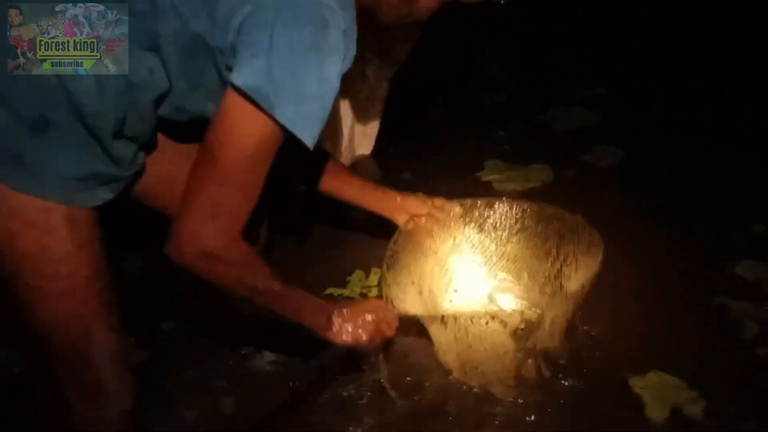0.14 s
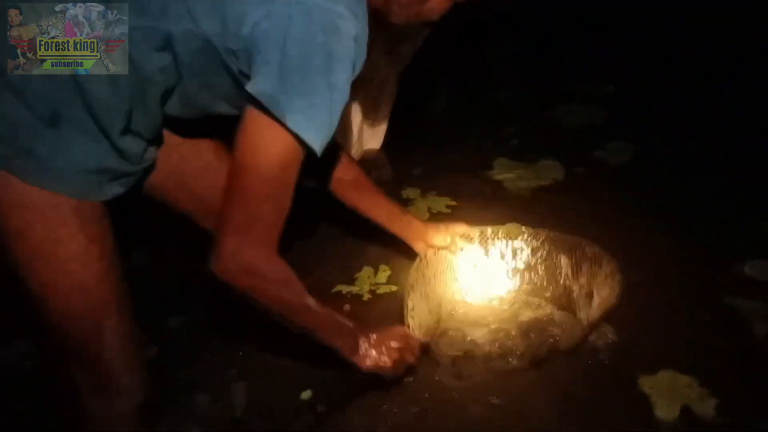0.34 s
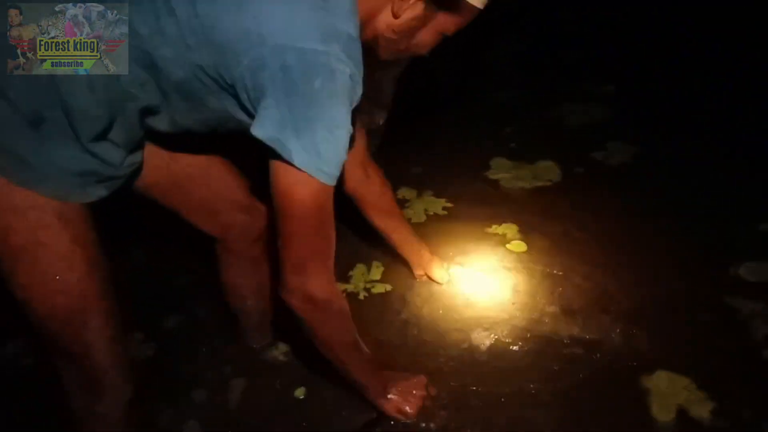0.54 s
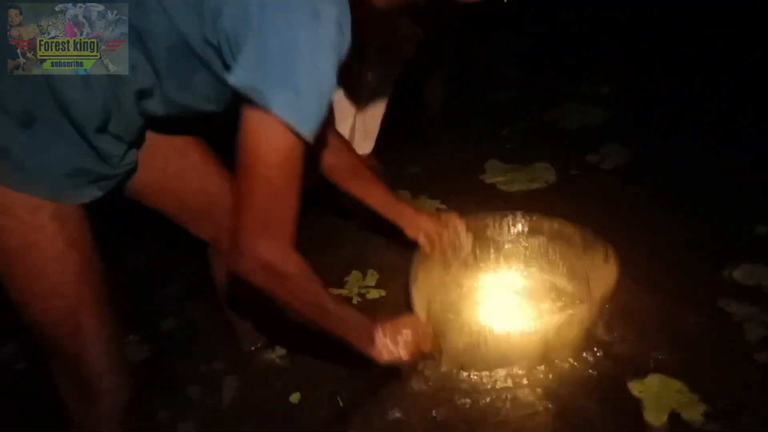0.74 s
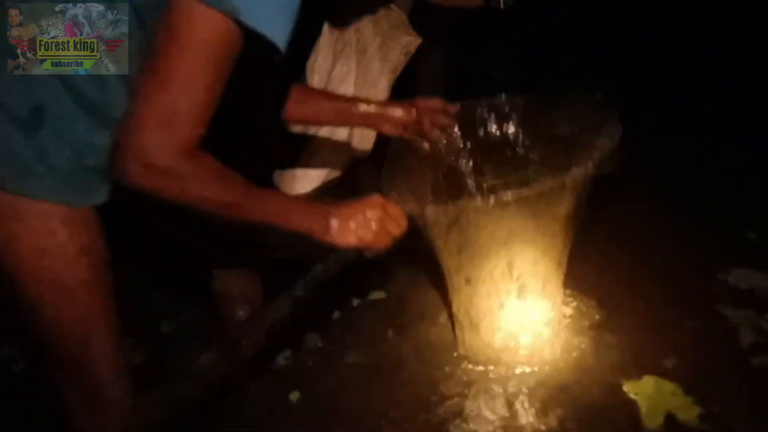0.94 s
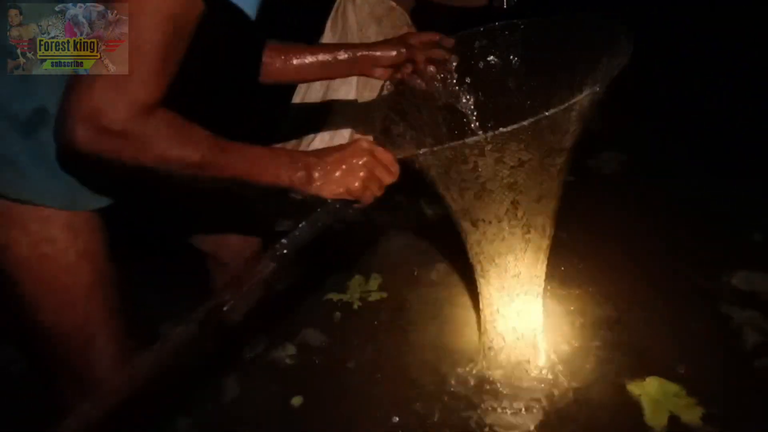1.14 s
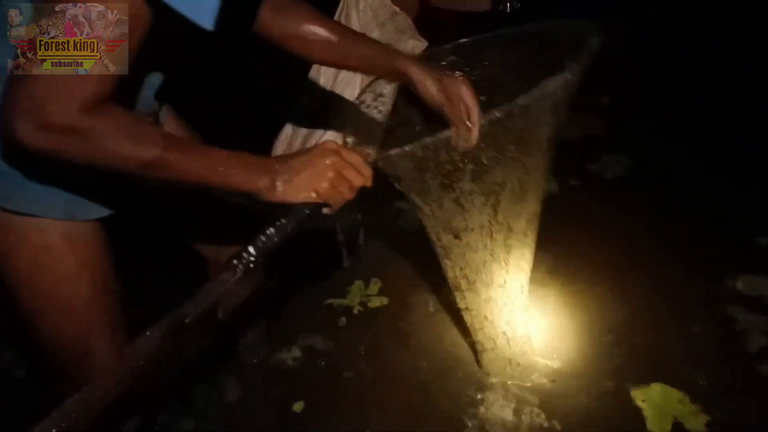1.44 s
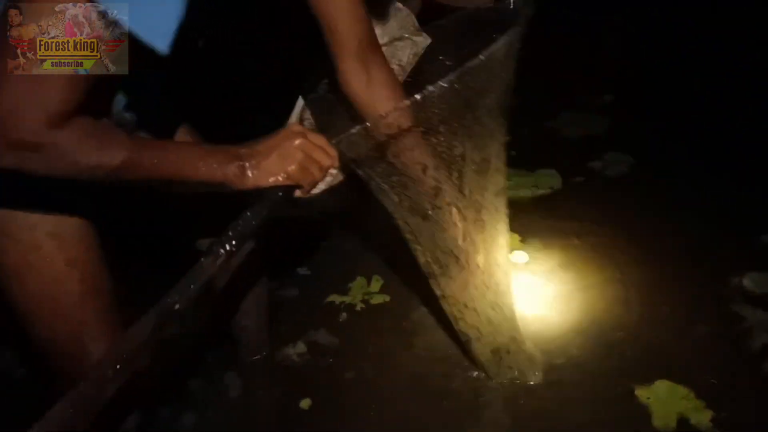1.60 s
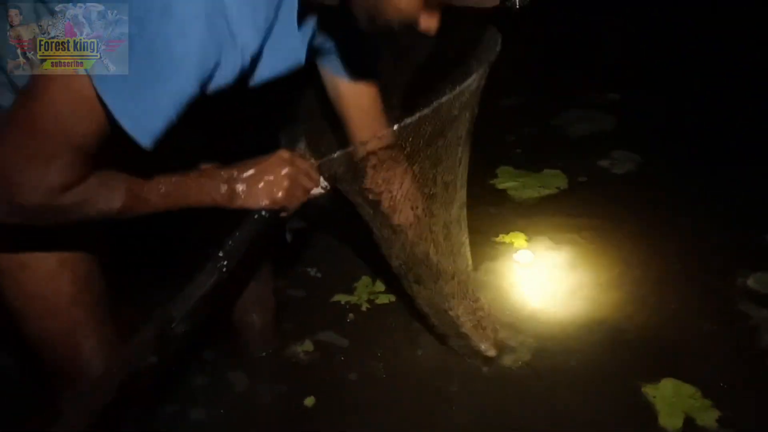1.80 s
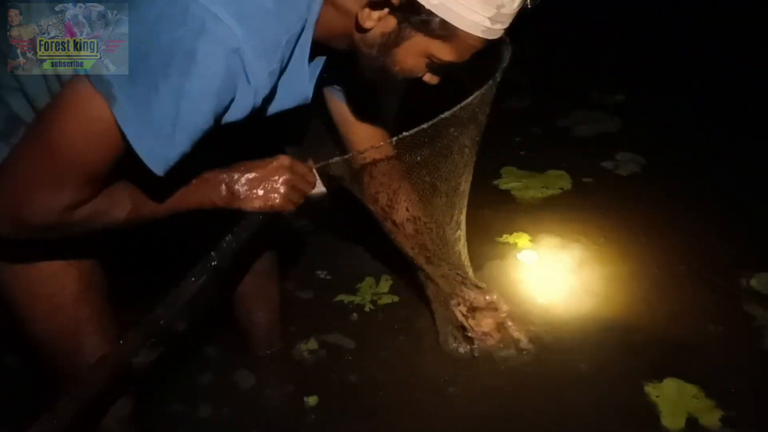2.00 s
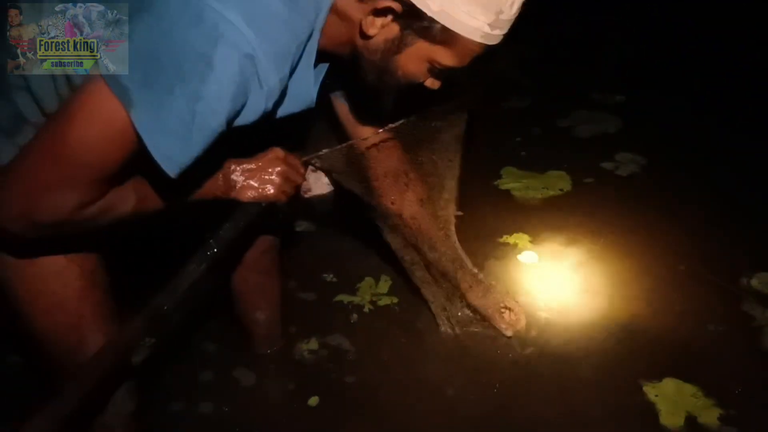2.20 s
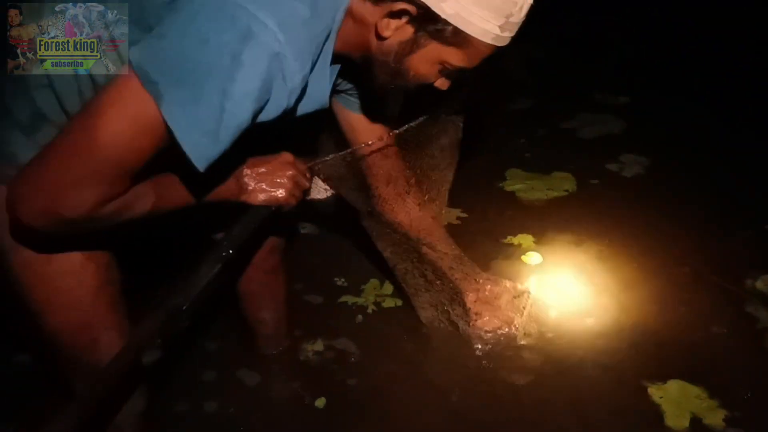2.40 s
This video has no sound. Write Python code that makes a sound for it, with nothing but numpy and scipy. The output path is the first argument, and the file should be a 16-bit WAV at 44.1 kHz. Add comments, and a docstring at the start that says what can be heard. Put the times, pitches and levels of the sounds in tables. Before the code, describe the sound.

A wet net splashes quickly in shallow water, then drips, over faint night crickets.

```python
"""Water slaps, streams and drips from a hand net dipped, lifted and shaken over shallows at night.
Tiny bubbles ring as damped oscillators, merging into spray and trickle; falling drops close larger ones
that sound single notes. A cricket chirps in threes with its wing strokes, a second answers faintly, and
distant frogs pulse their resonant throat sacs over the hiss of the night. A low tone swells at the end.
A small two-port microphone hears it all from close to the water."""
import sys
import numpy as np
from scipy import signal
from scipy.fft import rfft, irfft
from scipy.io import wavfile
from scipy.ndimage import uniform_filter1d

SR = 44100
rng = np.random.default_rng(int(sys.argv[2]) if len(sys.argv) > 2 else 0)


def store_wav(level_fs):
    """Save 16-bit WAV to argv[1]."""
    pcm = np.round(np.clip(np.atleast_2d(level_fs), -1, 1) * 32767)
    wavfile.write(sys.argv[1], SR, pcm.T.astype(np.int16))


N = 112454

# spectrum of fine water spray: f/Hz, level/dB
SPRAY_SPECTRUM = [(4000, -10.5), (6400, 3), (7300, -6), (9500, -3.5), (11000, -1), (13300, 6.5),
                  (16400, -9)]


def amp(db):
    """Amplitude ratio of a level in decibels."""
    return 10 ** (np.asarray(db) / 20)


def unit_rms(x):
    """Normalisation to unit mean power."""
    return x / np.sqrt(np.mean(x ** 2) + 1e-20)


def curve_at(points, hz):
    """Interpolation on a logarithmic frequency axis."""
    f, value = np.transpose(points)
    return np.interp(np.log(hz + 1), np.log(f + 1), value)


def add(mix, start_s, sound, early=0):
    """Superposition: the sound joins the mix `early` samples before start_s."""
    at = round(start_s * SR) - early
    part = mix[max(at, 0):][:len(sound) + min(at, 0)]
    part += sound[max(-at, 0):][:len(part)]


def coloured(x, spectrum):
    """Spectral shaping: x is weighted by the spectrum, silent outside it, at unit rms."""
    hz = np.fft.rfftfreq(len(x), 1 / SR)
    in_band = (hz > spectrum[0][0]) * (hz < spectrum[-1][0])
    return unit_rms(irfft(rfft(x) * amp(curve_at(spectrum, hz)) * in_band, len(x)))


def resonate(x, hz, width_hz):
    """Resonance by heterodyning: shift down, smooth twice, shift back; unit rms."""
    carrier = np.exp(2j * np.pi * hz * np.arange(len(x)) / SR)
    r = np.exp(-np.pi * width_hz / SR)
    baseband = signal.lfilter([(1 - r) ** 2], [1, -2 * r, r * r], x / carrier)
    return unit_rms((carrier * baseband).real)


def bubble_cloud(per_s, spread_db, lo_hz, hi_hz, cycles, pitches):
    """Shot noise: tiny bubbles, a few of them strong, ring at random times with a rising pitch."""
    strength = amp(spread_db * np.minimum(rng.exponential(1, N), 5))
    births = strength * (rng.random(N) < per_s / SR)
    pitch_index, out = rng.integers(0, pitches, N), np.zeros(N)
    for k, hz in enumerate(np.geomspace(lo_hz, hi_hz, pitches)):
        age = np.arange(1200) / SR * hz / cycles
        ring = np.sqrt(hz) * age * np.exp(-3 * age) * np.sin(2 * np.pi * cycles * age * (1 + 0.012 * age))
        out += signal.oaconvolve(births * (pitch_index == k), ring)[:N]
    return out


def stream():
    """Incoherent summation: countless bubbles merge into spray and trickle as water leaves the mesh."""
    # water leaving the net: t/s, spray level/dB, trickle level/dB
    outflow = [(0, -54, -45.5), (.04, -99, -63.5), (.17, -64.5, -58.5), (0.213, -56, -48),
               (.25, -74, -45.5), (.3, -48, -46.5), (.345, -53, -45), (0.408, -56, -45.5), (.45, -68, -58),
               (0.611, -69, -61.5), (0.662, -73, -48), (.71, -74, -57), (.81, -77, -67.5),
               (0.878, -57, -50.5), (1.0, -62, -53), (1.2, -65.5, -52), (1.38, -68, -53.5),
               (1.46, -71, -64.5), (2.55, -89, -62)]
    # spectrum of the trickle: f/Hz, level/dB
    trickle_spectrum = [(25, 7), (300, 1), (700, -6.5), (1050, -19), (1500, -10.5), (2400, 2), (4200, -2),
                        (4900, -4), (7000, -9.5)]
    fine = bubble_cloud(per_s=9000, spread_db=3, lo_hz=4940, hi_hz=15300, cycles=7.9, pitches=16)
    coarse = bubble_cloud(per_s=4500, spread_db=2.7, lo_hz=902.4, hi_hz=6930, cycles=16.3, pitches=24)
    spray = coloured(fine, SPRAY_SPECTRUM)
    wash = coloured(rng.standard_normal(N), trickle_spectrum)
    trickle = unit_rms(.75 * coloured(coarse, trickle_spectrum[2:]) + .25 * wash)
    times, spray_db, trickle_db = np.transpose(outflow)
    t = np.arange(N) / SR
    return spray * amp(np.interp(t, times, spray_db)) + trickle * amp(np.interp(t, times, trickle_db))


def crickets():
    """Stridulation: a fuzzy, narrow-band whistle is amplitude-modulated once per wing stroke."""
    # chirps of the near cricket: onset t/s, duration/s, level/dB
    near_chirps = [(-.055, 0.079, -43), (0.427, 0.072, -50.5), (0.895, 0.091, -48.5), (1.321, 0.087, -49.5),
                   (1.679, 0.116, -48), (2.179, 0.086, -51), (2.533, .084, -50)]
    # single strokes of the far cricket: onset t/s
    far_onsets = [.115, .565, .785, 1.055, 1.155, 1.465, 1.565, 1.905, 2.055, 2.335]
    stroke_s, stroke_depth, far_db = .029, .8, -60.5
    whistle = resonate(rng.standard_normal(N), hz=5453, width_hz=220)
    envelope = np.zeros(N)
    for start, length, db in near_chirps + [(s, stroke_s, far_db) for s in far_onsets]:
        t = np.arange(0, length, 1 / SR)
        strokes = 1 - stroke_depth * np.cos(np.pi * t / stroke_s) ** 4
        add(envelope, start, amp(db) * strokes * np.sin(np.pi * t / length) ** 0.057)
    return envelope * whistle


def night_hiss():
    """Random modulation: two uncorrelated hisses drift in level, in patches of time and frequency."""
    # spectrum of the night air: f/Hz, level/dB
    hiss_spectrum = [(36, 1), (130, -3.5), (400, -15.5), (700, -25), (1270, -21.5), (1940, -8), (2720, -21),
                     (3810, -8.5), (4700, -36), (5600, -9.5), (7000, -19.5), (8000, -13), (10000, -24.5),
                     (13500, -18), (16400, -32)]
    level_db, patch_db = -56, 6.5
    frames, hz = N // 256 + 5, np.fft.rfftfreq(1024, 1 / SR)
    re1, im1, re2, im2, patches = rng.standard_normal((frames, 513, 5)).T
    patches = unit_rms(uniform_filter1d(uniform_filter1d(patches, 12, axis=0), 10, axis=1))
    # steadier below 1130 Hz and above 3500 Hz
    drift_db = patch_db * np.minimum(hz / 1130, 1) * np.minimum(3500 / (hz + 1), 1) ** 2
    gain = amp(curve_at(hiss_spectrum, hz)[:, None] + drift_db[:, None] * patches)
    spectra = np.array([re1 + 1j * im1, re2 + 1j * im2]) * gain
    return amp(level_db) * unit_rms(signal.istft(spectra, nperseg=1024, noverlap=768)[1][:, :N])


def slaps():
    """Impact noise: each slap is a broadband burst, bright hiss over a watery body, trailing spray."""
    # slaps and spits of water: t/s, treble peak level/dB, body level re treble/dB, T60/s
    impacts = [(0.0024, -33.5, -21, 0.021), (0.2374, -41, 16, 0.016), (0.2434, -22.5, 5.5, 0.025),
               (0.259, -23.5, 5.5, 0.015), (0.3548, -15.5, -46, 0.01), (0.4252, -37, 10.5, 0.0084),
               (0.5205, -30.5, -2, 0.026), (0.629, -41, -29, 0.032), (0.6718, -39, 1.5, 0.039),
               (0.6822, -35.5, -33, 0.0071), (0.6924, -30.5, -38, 0.0066), (1.2115, -38.5, 2.5, 0.02),
               (1.734, -43, -25, 0.011), (1.794, -38.5, -18, 0.01), (1.803, -38, -30, 0.0048),
               (1.8305, -41.5, -7, 0.0082), (2.4184, -46, -14, 0.015), (2.5444, -39, -3.5, 0.0073)]
    # spectrum of a slap's body: f/Hz, level/dB
    body_spectrum = [(300, -26), (950, -40.5), (1200, -4), (1800, 1.5), (3500, -6), (6500, -7.5),
                     (7500, -13)]
    rise_ratio, tail_ratio = .55, 6.8  # multiples of the burst's T60
    tail_db, crest_db = -11, 5.5
    out, t = np.zeros(N), (np.arange(6144) - 1024) / SR
    for start, db, body_db, t60 in impacts:
        hiss = coloured(rng.standard_normal(len(t)), SPRAY_SPECTRUM)
        body = amp(body_db) * coloured(rng.standard_normal(len(t)), body_spectrum)
        age = (t - .002) / max(t60, .005)
        burst = np.where(age < 0, amp(60 * age / rise_ratio), amp(-60 * age))
        tail = np.clip(1 + age, 0, 1) * amp(tail_db - 60 * abs(age) / tail_ratio)
        add(out, start, amp(db - crest_db) * (burst + tail) * (hiss + body), early=1024)
    return out


def drips():
    """Bubble resonance: each drop lands with a tick and traps air that rings briefly and unevenly."""
    # bubbles closed by falling drops: t/s, peak level/dB, f/Hz, T60/s
    bubbles = [(0.2463, -27, 1680, 0.014), (0.344, -37.5, 1060, 0.019), (0.355, -18, 3060, 0.0049),
               (0.369, -29.5, 2270, 0.013), (0.38, -39, 1250, 0.03), (0.391, -38, 3210, 0.024),
               (0.399, -33.5, 3040, 0.013), (0.395, -35.5, 1185, .04), (.408, -38, 2960, 0.028),
               (.427, -39.5, 920, 0.081), (.429, -49.5, 591, 0.066), (0.5208, -26, 2650, 0.011),
               (.525, -26.5, 3100, 0.011), (.627, -40, 2560, 0.017), (0.646, -43, 4300, .01),
               (.6645, -33.5, 2050, 0.017), (0.6698, -25.5, 1990, 0.0076), (0.675, -40, 1320, 0.011),
               (.677, -39.5, 1156, 0.023), (1.112, -42, 2470, 0.047), (1.209, -21, 2590, 0.013),
               (1.227, -25, 2680, 0.013), (1.257, -38, 1110, 0.026), (1.2655, -32, 1160, 0.022),
               (1.277, -37, 1215, 0.019), (1.337, -30, 3780, 0.021), (1.339, -33, 3100, 0.018),
               (1.365, -47, 1188, 0.048), (1.508, -42.5, 4520, 0.012), (1.788, -39, 4100, 0.0068),
               (2.103, -43.5, 4470, 0.0033), (2.161, -30.5, 2630, 0.017), (2.2, -46, 2920, 0.019),
               (2.266, -41, 4200, .01), (2.501, -40, 2306, 0.045)]
    roughness, rough_cycles, rise_cycles, tick_t60_s = .36, 3, 2.3, .0072
    out, t = np.zeros(N), np.arange(6000) / SR
    for start, db, hz, t60 in bubbles:
        cycles, span = hz * t, int(rough_cycles * SR / hz)
        noise = rng.standard_normal((2, len(t)))
        re, im = unit_rms(uniform_filter1d(uniform_filter1d(noise, span), span))
        tone = np.real((1 + roughness * (re + 1j * im)) * np.exp(2j * np.pi * cycles))
        rise = 1 - np.exp(-(cycles / rise_cycles) ** 2)
        fall = amp(db - 60 * (t / t60) ** 1.6)
        add(out, start - .001, rise * fall * tone)
        tick = coloured(rng.standard_normal(len(t)), SPRAY_SPECTRUM)
        tick_gain = amp(db - 6.5) * (hz / 4300) ** 4  # small, high drops tick the most
        add(out, start, tick_gain * amp(-60 * t / tick_t60_s) * tick)
    return out


def frogs():
    """Source and filter: uneven pulses excite the resonances of the throat sac under an arched level."""
    # croaks: onset t/s, duration/s, level/dB
    croaks = [(0.842, 0.17, -57), (1.407, 0.032, -52), (1.549, 0.054, -55), (1.736, 0.047, -52.5),
              (1.782, 0.044, -52), (1.853, 0.088, -52), (2, 0.028, -56), (2.244, 0.037, -54.5),
              (2.313, 0.033, -52), (2.389, 0.059, -52.5)]
    # resonances of the throat sac: f/Hz, width/Hz, level/dB
    sac_modes = [(1970, 440, 2), (3780, 290, 3.5)]
    pulse_hz, jitter, noise_share = 259.3, .0918, .38
    out, t = np.zeros(N), np.arange(6000) / SR
    for start, length, db in croaks:
        wander, noise = rng.standard_normal((2, len(t)))
        cycles = np.cumsum(pulse_hz * (1 + jitter * unit_rms(uniform_filter1d(wander, 150)))) / SR
        pulses = unit_rms(np.diff(np.floor(cycles), prepend=0))
        drive = (1 - noise_share) * pulses + noise_share * noise
        sac = unit_rms(sum(amp(mode_db) * resonate(drive, hz, width) for hz, width, mode_db in sac_modes))
        arch = np.sin(np.pi * np.clip(t / length, 0, 1)) ** .5
        add(out, start, amp(db) * sac * arch)
    return out


def low_swell():
    """Exponential growth: a low pure tone rises out of the hiss at the very end."""
    # the tone: f/Hz, final level/dB, growth/(dB/s)
    tone = (418, -48, 300)
    hz, final_db, db_per_s = tone
    t = np.arange(N) / SR
    return amp(final_db + db_per_s * (t - t[-1])) * np.sin(2 * np.pi * hz * t)


def scattered(x, t60):
    """Diffuse scattering: short random reflections from water and bodies, at unit energy."""
    taps = rng.standard_normal(4000) * amp(-60 * np.arange(4000) / SR / t60)
    return signal.oaconvolve(x, taps / np.linalg.norm(taps))[:N]


def ports(direct, unrelated, coherence, lean_db=0):
    """Partial coherence: two microphone ports share part of a sound, with their own colour and delay."""
    # imbalance of the ports: f/Hz, left level re right/dB
    imbalance = [(200, 0.5), (700, -2.5), (1290, 0.5), (2380, 10), (4400, 8.5), (8100, -6), (15000, 15)]
    left_lag_s = .0001
    hz = np.fft.rfftfreq(N, 1 / SR)
    shared = np.clip(curve_at(coherence, hz), 0, 1)
    left = rfft(direct)
    advanced = left * np.exp(2j * np.pi * hz * left_lag_s)
    right = shared * advanced + np.sqrt(1 - shared ** 2) * rfft(unrelated)
    tilt = amp(curve_at(imbalance, hz) + lean_db)
    return irfft(np.array([left * tilt, right]) * 2 / (1 + tilt), N)


def scene():
    """Superposition at the ports: water, frogs and tone with their reflections, crickets, night hiss."""
    # likeness of the ports for the distinct sources: f/Hz, coherence
    source_coherence = [(1200, .9), (2500, .3)]
    # likeness of the ports for the night hiss: f/Hz, coherence
    hiss_coherence = [(40, 0.8), (150, 0.43), (700, 0.21), (2500, 0.077)]
    pair = [stream() + slaps() + drips() + frogs() + low_swell() for _ in range(2)]
    direct, other = (x + amp(-12) * scattered(x, t60=.05) for x in pair)
    shallows = ports(direct, scattered(other, t60=.0036), source_coherence)
    chirping = ports(crickets(), crickets(), source_coherence, lean_db=10)
    return shallows + chirping + ports(*night_hiss(), hiss_coherence)


def record(dry):
    """Band limiting: a linear-phase low-pass filter cuts off at 16 kHz."""
    low_pass = signal.firwin(255, 16000, window=("kaiser", 9), fs=SR)
    return signal.oaconvolve(dry, low_pass[None], "same")


dry = scene()
out = record(dry)
store_wav(out)
```